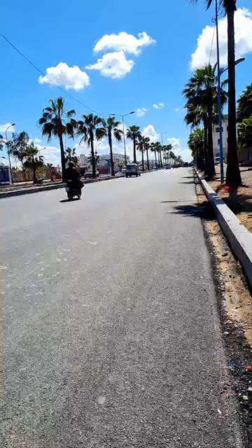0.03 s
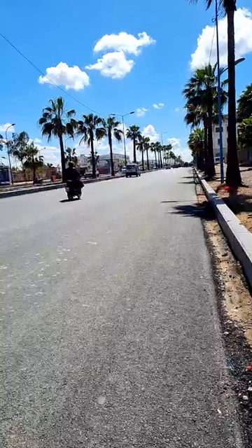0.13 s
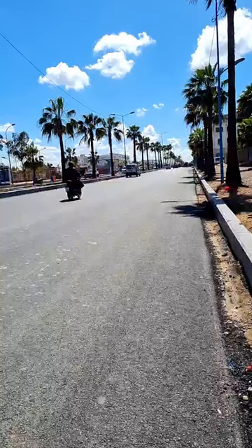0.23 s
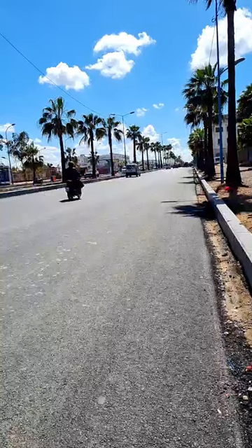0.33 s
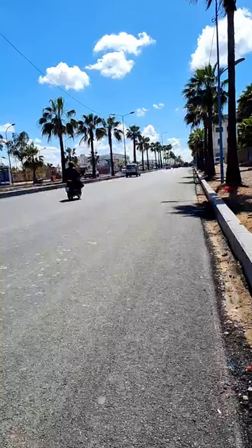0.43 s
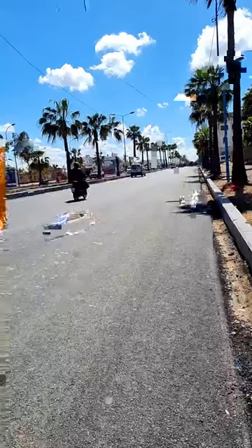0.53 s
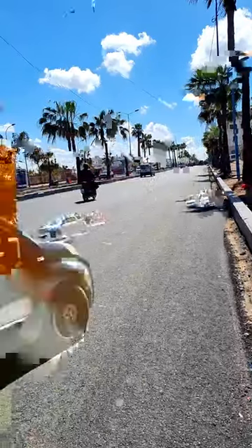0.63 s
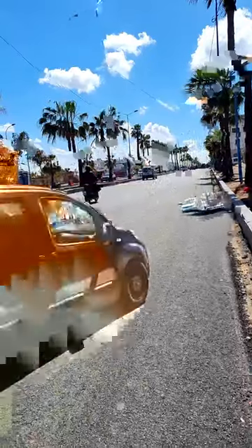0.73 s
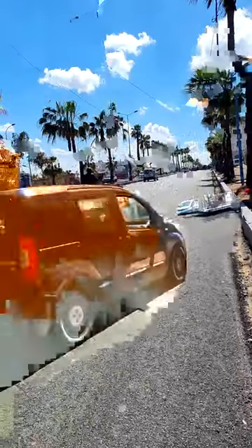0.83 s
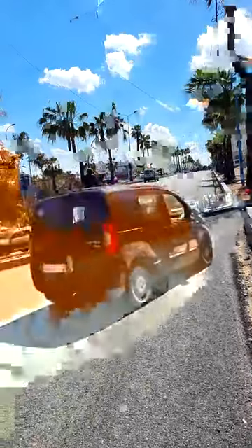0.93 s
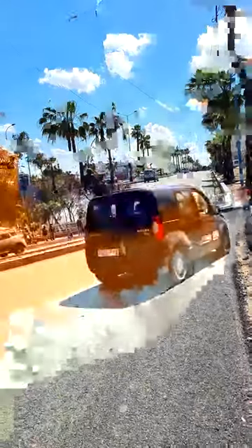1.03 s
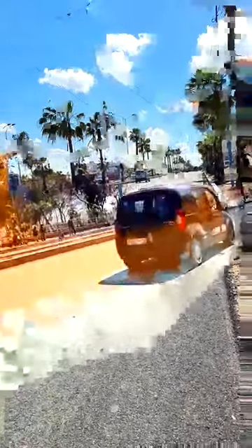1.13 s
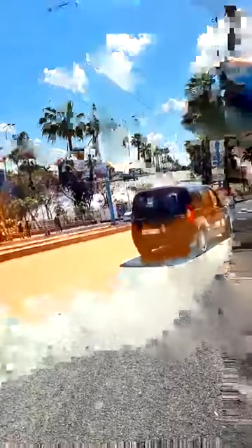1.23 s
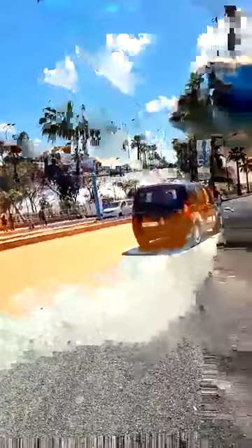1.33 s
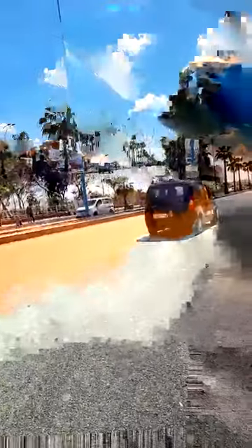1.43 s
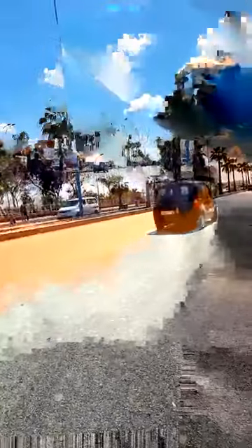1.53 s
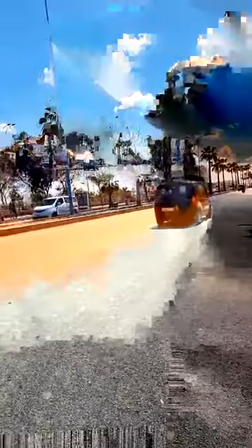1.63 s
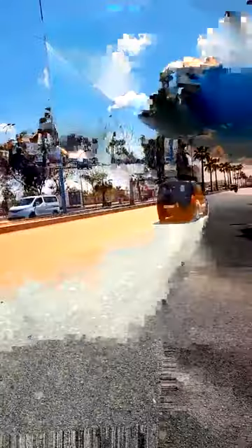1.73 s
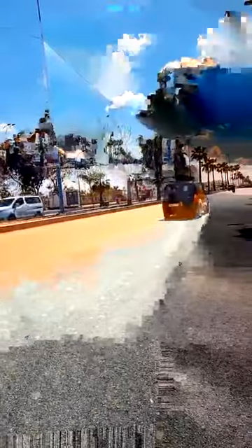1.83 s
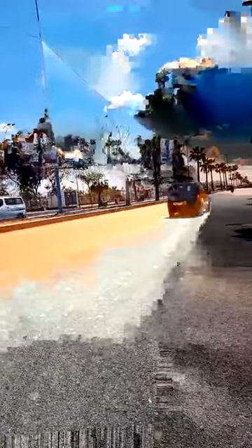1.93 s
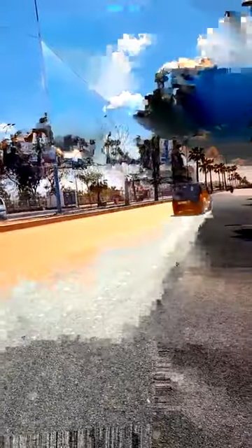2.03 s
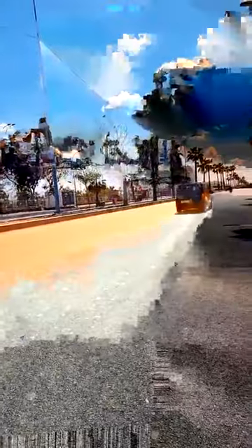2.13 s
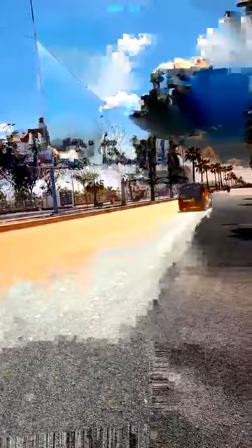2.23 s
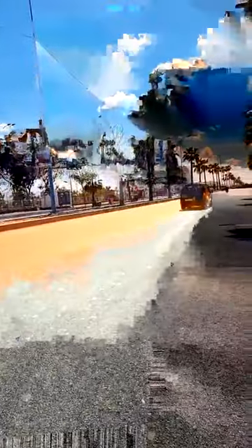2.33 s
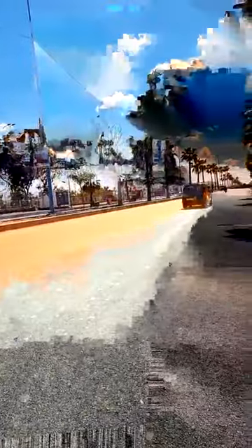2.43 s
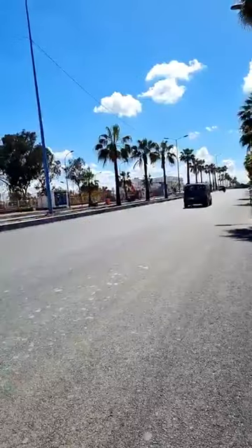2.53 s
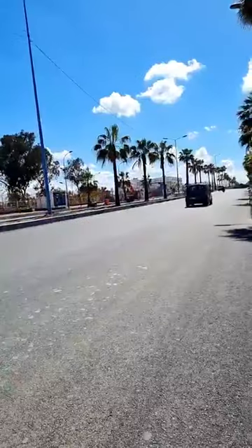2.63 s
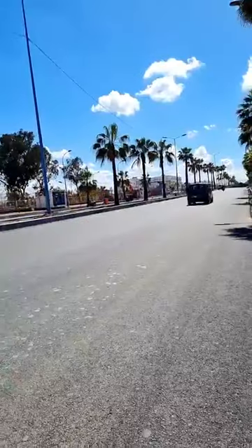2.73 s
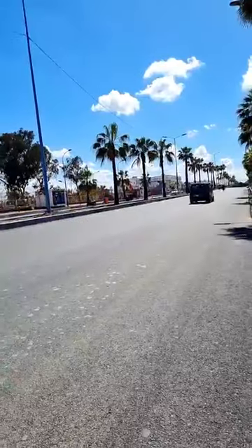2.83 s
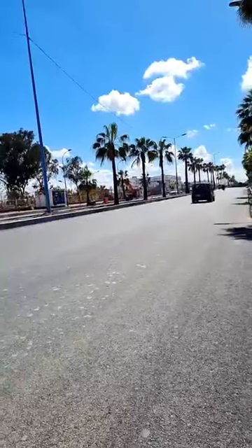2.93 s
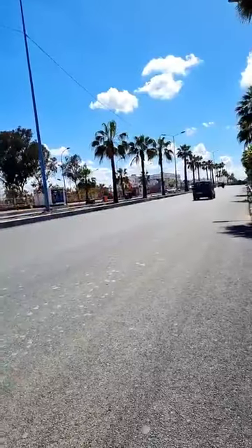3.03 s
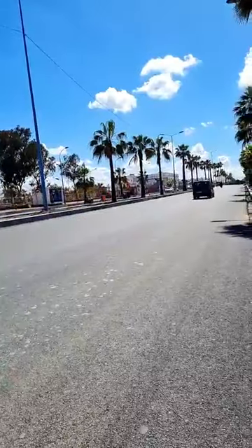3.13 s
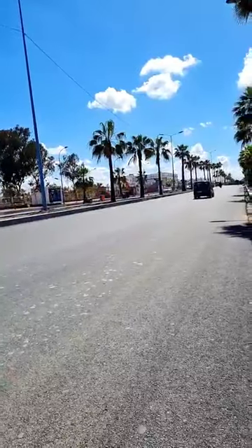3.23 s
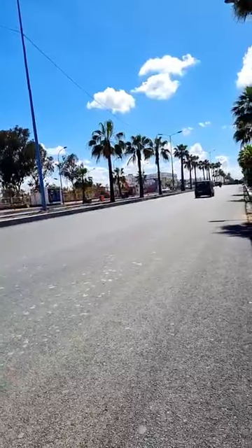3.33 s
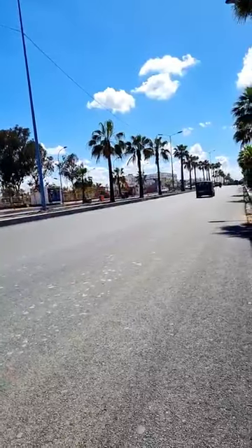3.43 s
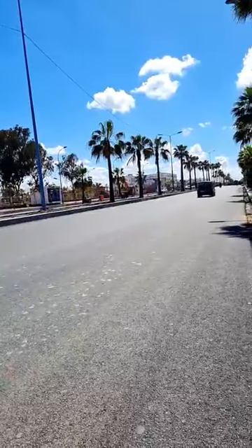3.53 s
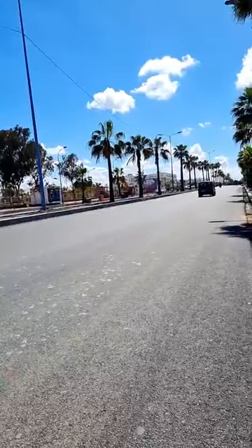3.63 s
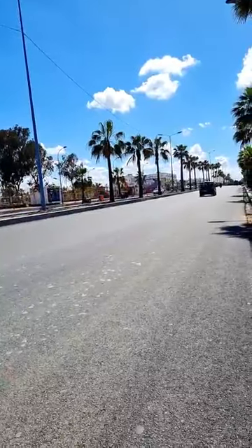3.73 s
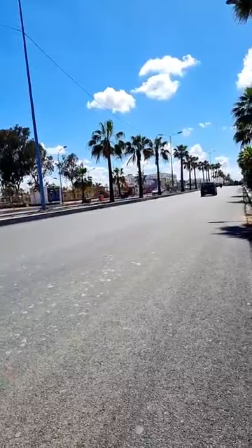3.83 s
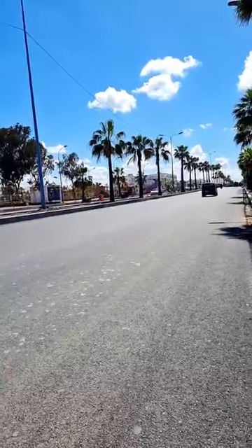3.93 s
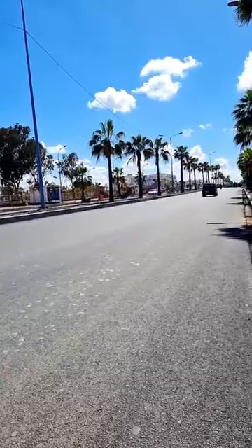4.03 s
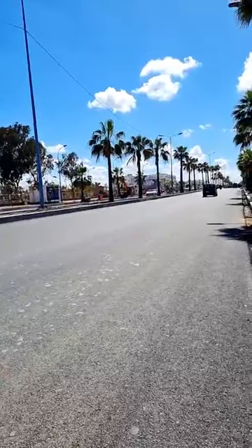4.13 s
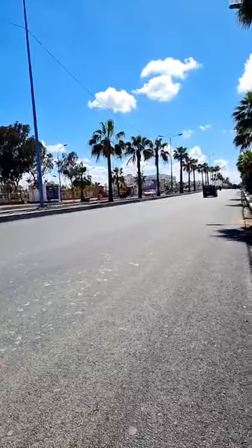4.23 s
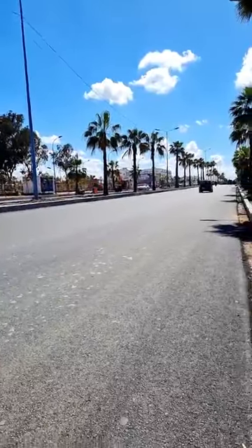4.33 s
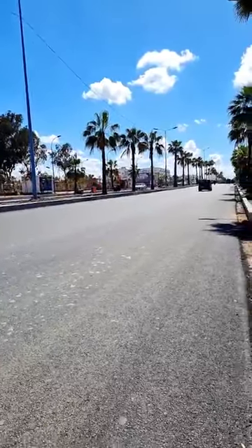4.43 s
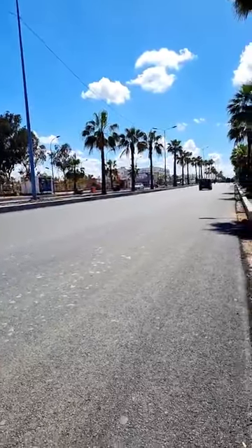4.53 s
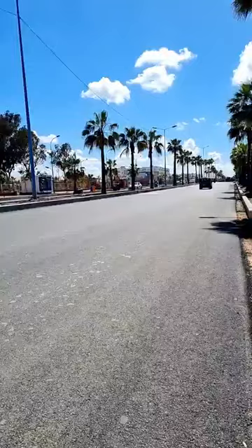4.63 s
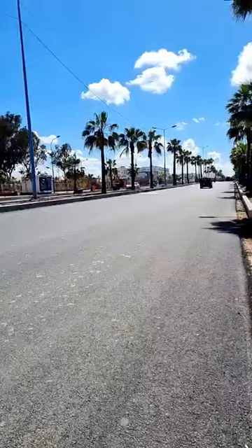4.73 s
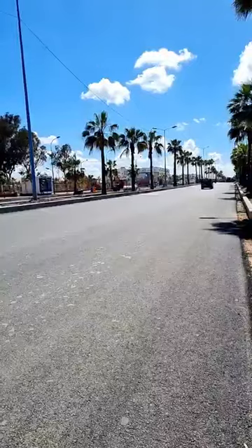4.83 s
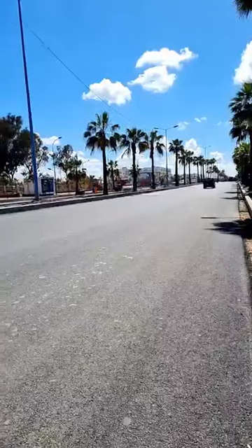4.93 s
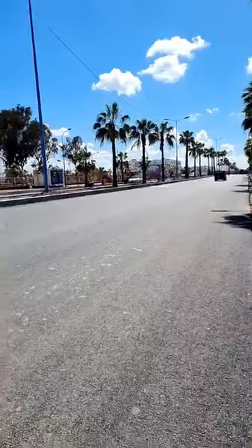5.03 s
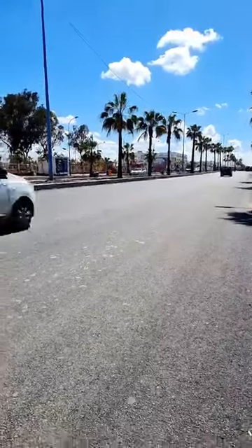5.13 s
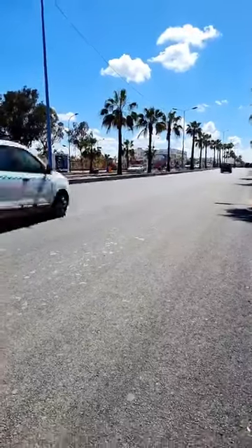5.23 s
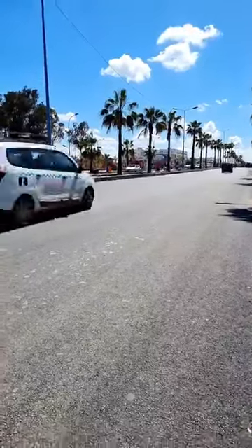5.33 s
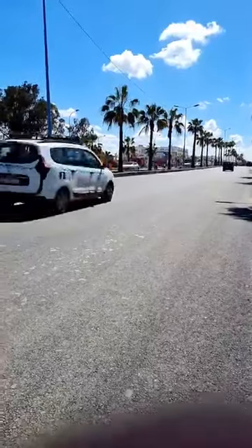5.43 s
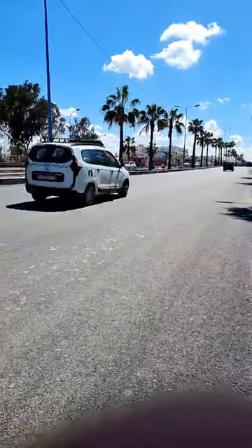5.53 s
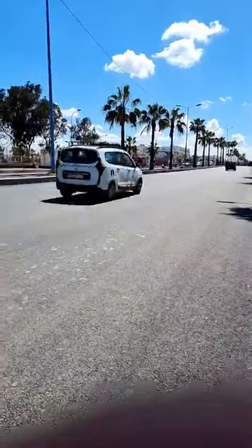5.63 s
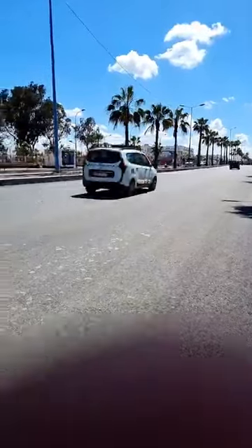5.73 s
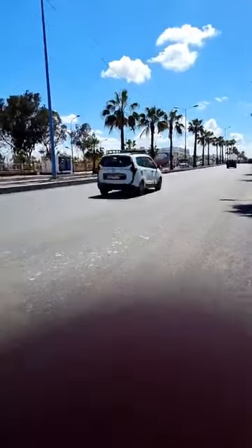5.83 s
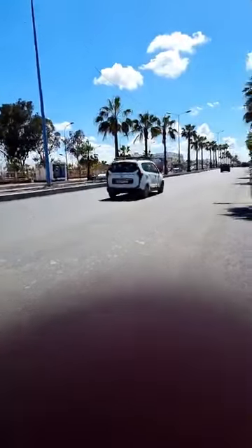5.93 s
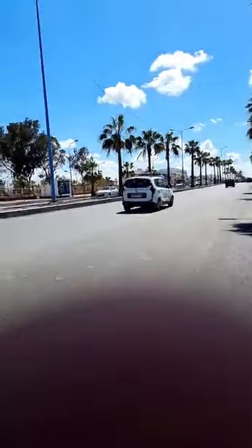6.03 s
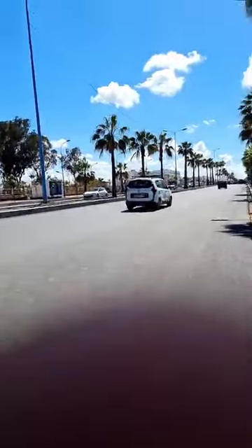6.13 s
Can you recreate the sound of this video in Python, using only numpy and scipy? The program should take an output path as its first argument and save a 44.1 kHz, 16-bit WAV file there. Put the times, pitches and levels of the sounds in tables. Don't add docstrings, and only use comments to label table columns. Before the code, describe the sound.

Silence until about 0.56 s, when the phone abruptly begins to hear a sunny roadside. A near car pulls away, its tyre roar strongest around 0.7 s, with rapid dry valve ticks, about forty a second, fading and vanishing by 1.4 s. A very faint high electronic whistle ends there too. Low, slightly band-limited traffic rumble stays, with a small engine's drone, a heavy vehicle's distant throb and scattered dull panel raps; a farther car swells weakly near 2.7 s. From 3.6 s a second engine grows. Tyre pops crack at 4.39 and 4.46 s, a deep wheel thud lands at 4.6 s, and the car roars by around 4.85 s, pitch sliding slightly down, easing at 5.2 s. From 5.4 s a finger gradually covers the microphone, making the road noise hollow, with light skin rubs and small clicks at 5.76 and 5.9 s, until 6.17 s.

```python
import sys
import numpy as np
from scipy import signal
from scipy.fft import rfft, irfft, next_fast_len
from scipy.io import wavfile
from scipy.ndimage import uniform_filter1d, map_coordinates

SR = 44100
rng = np.random.default_rng(int(sys.argv[2]) if len(sys.argv) > 2 else 0)


def level_to_linear(level):
    exponent = np.asarray(level, float) / 20
    return 10 ** exponent


def inscribe(sig):
    pcm = np.round(np.clip(np.atleast_2d(sig).T, -1, 1) * 32767)
    wavfile.write(sys.argv[1], SR, pcm.astype(np.int16))


N = 272097
T = np.arange(N) / SR


def unit(x):
    return x / np.sqrt(np.mean(x ** 2) + 1e-20)


def curves(rows):
    s, *cols = np.transpose(rows)
    return [np.interp(T, s, c) for c in cols]


def wobble(rate):
    coarse = T[::32]
    knots = rng.standard_normal(int(N * rate / SR) + 4)
    return np.interp(T, coarse, map_coordinates(knots, [coarse * rate]))


def bump(s, long_s):
    return np.exp(-((T - s) / long_s) ** 2)


def ramp(start, end):
    return np.clip((T - start) / (end - start), 0, 1)


def blend(share, far, near):
    share = np.clip(share, 0, 1)
    return np.sqrt(1 - share) * far + np.sqrt(share) * near


def filtered(x, response):
    m = next_fast_len(N + 8192)
    return irfft(rfft(x, m) * response(np.fft.rfftfreq(m, 1 / SR)), m)[:N]


def coloured(x, points):
    f, v = np.transpose(points)
    return filtered(x, lambda hz: level_to_linear(np.interp(np.log(hz + 1), np.log(f + 1), v)))


def rush(spectrum, patchy_db):
    z = signal.stft(rng.standard_normal(N), nperseg=1024)[2]
    field = uniform_filter1d(rng.standard_normal(z.shape), size=6, axis=0)
    field = uniform_filter1d(field, size=7, axis=1)
    patchy = signal.istft(z * level_to_linear(patchy_db * unit(field)), nperseg=1024)[1][:N]
    return unit(coloured(patchy, spectrum))


def lifted(x, bands, octaves):
    hz, t, z = signal.stft(x, SR, nperseg=1024)

    def at(v):
        return np.interp(t, T, v + 0 * T)

    db = 0
    for centre, lift in bands:
        distance = np.log2((hz[:, None] + 1) / at(centre)) / octaves
        db = db + at(lift) * np.exp(-distance ** 2)
    return signal.istft(z * level_to_linear(db), SR, nperseg=1024)[1][:N]


def order(hz, multiple, db, shake_db, drift):
    phase = 2 * np.pi * multiple * np.cumsum(hz) / SR + drift * wobble(5) + rng.uniform(0, 2 * np.pi)
    return np.sqrt(2) * level_to_linear(db + shake_db * wobble(6.1)) * np.sin(phase)


# t/s, f/Hz, level/dB
THROB = [(.56, 46.75, -26.5), (1.1, 49.02, -38), (2, 56.05, -37), (2.4, 53.28, -35), (2.8, 57.08, -40.5),
         (3.1, 53.13, -30), (3.9, 46.44, -34), (4.4, 47.5, -42), (6.17, 45.1, -40.5)]


def heavy_throb():
    hz, db = curves(THROB)
    return order(hz, 1, db, shake_db=1.8, drift=1.1)


# t/s, length/s, order, level/dB
SURGES = [(4.625, .12, 1, -31.5), (4.62, 0.14, 2, -31.5), (5.557, 0.15, 1, -27.5), (5.75, .35, 2, -33),
          (5.802, .2, 3, -36)]


def engine_behind():
    hz = np.full(N, 54.6)
    out = 0
    for s, long_s, multiple, db in SURGES:
        out = out + bump(s, long_s) * order(hz, multiple, db, shake_db=2, drift=0.18)
    return out


# t/s, f/Hz
DRONE_RATE = [(.5833, 41.0), (1.4, 41.25), (2.25, 41.5), (3.5, 42.1), (4.6, 42), (6.17, 41.5)]
# t/s, level/dB
DRONE = [(.56, -29.5), (1.0, -31.5), (1.4, -36), (2.2, -34), (3, -32.5), (3.6, -35.5), (4.3, -32.5),
         (4.9, -37), (6.17, -35.5)]
# multiple of the firing rate, level/dB
DRONE_ORDERS = [(2, -6.5), (3, -2), (4, -1), (5, 2.5), (6, 0), (7, -2)]


def drone():
    hz, db = curves(DRONE_RATE)[0], curves(DRONE)[0]
    return sum(order(hz, k, db + level - 7.5, shake_db=2, drift=0.66) for k, level in DRONE_ORDERS)


# t/s, peak level/dB, pulse length/ms, snap/ms
KNOCKS = [
    (4.3888, -8, .9, .12),
    (4.3887, -15, .1, .025),
    (4.456, -14, 1.5, .4),
]


def tyre_pops():
    out, t = np.zeros(N), np.arange(-2048, 2048) / SR
    for s, db, ms, snap_ms in KNOCKS:
        u = np.clip(t / (ms / 1000), -60, 60)
        snapped = (1 + np.tanh(u * ms / snap_ms)) / 2
        building = (1 - snapped) * np.exp(u / 0.87)
        recovering = 0.63 * snapped * np.exp(-u / 2.3)
        out[round(s * SR) - 2048:][:len(t)] += level_to_linear(db) * (building - recovering)
    return out


def wheel_thud():
    start_s, peak_db, ring_hz, t60_s = 4.5975, -2, 84, .06
    out, t = np.zeros(N), np.arange(2048) / SR
    thud = level_to_linear(peak_db - 60 * t / t60_s) * (1 - np.exp(-t / .004)) * np.sin(2 * np.pi * ring_hz * t)
    out[round(start_s * SR):][:len(t)] -= thud
    return out


# t/s, peak level/dB, ring f/Hz
DULL_RINGS = [(0.615, -17.5, 1005), (0.869, -19, 805), (1.433, -21.5, 630), (1.675, -17, 1020), (2.796, -25, 692),
              (3.61, -26, 770), (3.66, -19, 622), (5.139, -20.5, 905), (5.447, -21.5, 960)]


def dull_rings():
    out, t = np.zeros(N), np.arange(2048) / SR
    for s, db, hz in DULL_RINGS:
        ring = np.sin(2 * np.pi * hz * t) + 0.18 * np.sin(2 * np.pi * 1.37 * hz * t)
        out[round(s * SR):][:len(t)] += level_to_linear(db + 5 - 60 * t / .016) * (1 - np.exp(-t / .0006)) * ring
    return out


# t/s, peak level/dB, length/ms
RUBS = [(5.753, -35, 2.4), (5.775, -40, 18.5), (5.83, -47, 32), (5.862, -45, 28), (5.97, -46, 83),
        (6.055, -37, 3.3), (6.069, -42, 3.7), (6.14, -44, 11.2)]
# t/s, level/dB
TAPS = [
    (5.7565, -21),
    (5.9052, -26),
]
# f/Hz, level/dB
CASE = [(1200, -26), (2000, -7), (3000, -6), (3700, 0), (4500, -6), (5500, -6), (6500, -8), (7600, -15),
        (9000, -60)]


def finger():
    level = sum(level_to_linear(db) * np.exp(-((T - s) * 1000 / ms) ** 2 * 2) for s, db, ms in RUBS)
    grain = level_to_linear(-8 + 2 * wobble(300))
    rubs = level * grain * unit(coloured(rng.standard_normal(N), CASE))
    taps = np.zeros(N)
    for s, db in TAPS:
        taps[round(s * SR)] = level_to_linear(db + 17.5)
    ring_hz, wide_hz, ring_db = 3650, 450, .5

    def ring(f):
        return .75 + level_to_linear(ring_db) * 1j * f * wide_hz / (ring_hz ** 2 - f * f + 1j * f * wide_hz)

    return rubs + filtered(coloured(taps, CASE), ring)


# t/s, length/s, level/dB
TICK_LULL = (1.13, 0.035, -2.5)


def ticks_db():
    swing = 3 * np.cos(2 * np.pi * (T - 0.638) / .0735)
    s, long_s, lull_db = TICK_LULL
    lull = lull_db * bump(s, long_s)
    sag = 13 * np.abs(T - CARS[0][0] - .08)
    lost = 71.5 * np.maximum(T - 1.32, 0)
    return -29.5 + swing + lull - sag - lost


# f/Hz, width/Hz, level/dB
VALVE = [(2800, 300, -12), (3550, 220, -9), (3930, 220, -2.5), (4470, 230, 0), (5550, 350, -10),
         (6300, 400, -16)]
# start t/s, end t/s
RECEDE_S = (1.08, 1.2)


def valves():
    turns = np.cumsum(curves(DRONE_RATE)[0] * (T > .5833)) / SR
    at = np.searchsorted(turns, np.arange(int(turns[-1]))) + 30
    luck = rng.standard_normal((len(at), 3))
    blows = np.zeros(N + SR)
    blows[at] = level_to_linear(1.3 * luck[:, 0])
    bounce_after = np.round(59.1 + 1.3 * luck[:, 1]).astype(int)
    blows[at + bounce_after] = level_to_linear(-4 + 1.5 * luck[:, 2])
    rattle = 0.036 * level_to_linear(-60 * (turns % 1) / 0.52) * rng.standard_normal(N) * (turns > 0)

    def cover(f):
        total = 0
        for k, (centre, wide, db) in enumerate(VALVE):
            total = total + (-1) ** k * level_to_linear(db) * 1j * f * wide / (centre * centre - f * f + 1j * f * wide)
        return total

    def sharp(f):
        return cover(f) * cover(f) / (np.abs(cover(f)) + 0.12)

    struck = level_to_linear(ticks_db() + 29) * (blows[:N] + rattle)
    gone = ramp(*RECEDE_S)
    near = filtered(struck * (1 - gone), sharp)
    return near + filtered(struck * gone, lambda f: sharp(f * 1.03))


# t/s, length/s, second order level/dB
BARK = (4.77, 0.037, -25.5)


def passing_engine():
    coming_hz, going_hz, slide_s = 67.4, 63.4, 0.22
    hz = going_hz + (coming_hz - going_hz) * (1 - np.tanh((T - CARS[1][0]) / slide_s)) / 2
    pull_s, lift_s, coast_db = 3.6, 5.22, -12
    load = ramp(pull_s - .04, pull_s + .04) * (1 - ramp(lift_s - .05, lift_s + 0.036))
    first_db = -31.5 + 4.5 * (T - pull_s) + coast_db * (1 - load)
    s, long_s, bark_db = BARK
    second_db = 20 * np.log10(level_to_linear(first_db - 5.5) + level_to_linear(bark_db) * bump(s, long_s))
    heard = np.clip((T - 3.2) / .3, 0, 1) * np.clip((5.6 - T) / 0.22, 0, 1)
    first = order(hz, 1, first_db, shake_db=1.5, drift=0.2)
    return heard * (first + order(hz, 2, second_db, shake_db=1.4, drift=0.3))


# t/s, time to roll its distance/s, roar level/dB, whine level/dB, hiss level/dB
CARS = [
    (.7, 0.26, -24.5, -43, -40),
    (4.85, 0.38, -26.5, -37.5, -41.5),
    (2.7, .5, -42.5, -53.5, -55.5),
]
FALL_DB = {"rumble": 10.5, "roar": 12, "whine": 9.5, "hiss": 20}
AHEAD_S = {"rumble": 0.03, "roar": 0.0089, "whine": 0.16, "hiss": 0.08}
CITY_DB = {"rumble": -30, "roar": -34, "whine": -55.5, "hiss": -50}
# t/s, level/dB
TRAFFIC = [(.56, -0.5), (1.5, 0.6), (2.3, -.5), (2.85, 1.9), (3.2, 3.5), (3.6, 1), (4.2, 1), (5.5, 4.5),
           (6.17, 1)]
COVER_DB = {"rumble": 1, "roar": -6.5, "whine": 5.5, "hiss": -1}
COVER_S, COVERED_S = 5.4, 6.14


def layer_db(name, column, over_db=0):
    swell = curves(TRAFFIC)[0] * (1 if name == "rumble" else 0.26)
    power = level_to_linear(CITY_DB[name] + swell) ** 2
    for car in CARS:
        away = (T - car[0] + AHEAD_S[name]) / car[1]
        power = power + level_to_linear(car[column] + over_db - FALL_DB[name] * np.log10(1 + away ** 2)) ** 2
    return 10 * np.log10(power) + COVER_DB[name] * ramp(COVER_S, COVERED_S)


# t/s, length/s
FACING = [
    [(.58, 0.084), (.95, 0.37)],
    [(4.68, .22), (5.05, .2)],
]


def faces(table):
    bands = []
    for sides, times in zip(table, FACING):
        for side, when in zip(sides, times):
            bands += [(hz, db * bump(*when)) for hz, db in side]
    return bands


# f/Hz, level/dB per Hz
RUMBLE = [(13, -32), (22, -4), (70, 2.5), (226, -4.5), (288, -5.5), (342, -15.5), (400, -14.5),
          (520, -31.5), (880, -120)]
# f/Hz, level/dB per Hz
BOOM = [(13, -34.5), (22, -8.5), (54, 0), (120, -2.5), (177, -10.5), (252, 1.5), (359, -19), (400, -13),
        (520, -44), (880, -120)]


def rumble(swell):
    near = (layer_db("roar", column=2) + 32) / 7
    noise = blend(near, rush(RUMBLE, patchy_db=1), rush(BOOM, patchy_db=1))
    return level_to_linear(layer_db("rumble", column=2, over_db=1) - 1.5 + 0.44 * swell) * noise


# f/Hz, level/dB per Hz
ROAR_FAR = [(180, -38), (300, -9), (332, -4), (602, -4.5), (733, -6.5), (1120, -8.5), (1700, -22),
            (2210, -43), (3740, -120)]
ROAR_NEAR = [(180, -35.5), (300, 3.5), (481, -1.5), (733, -2), (1020, -1), (1250, -5.5), (1700, -16),
             (2210, -40), (3740, -120)]
# f/Hz, lift level/dB
SING = [
    [[(1000, -2)], [(930, 3), (620, 2)]],
    [[(1120, 2)], [(860, 6)]],
]
# f/Hz, lift level/dB
POCKET = [
    (2150, 5.5),
    (790, 7),
]


def roar(swell):
    db = layer_db("roar", column=2)
    noise = blend((db + 32) / 7, rush(ROAR_FAR, patchy_db=0.55), rush(ROAR_NEAR, patchy_db=1.05))
    full_hz, full_db = POCKET[1]
    far_sing = (647, 1.22)  # Hz, dB
    sing = faces(SING) + [far_sing, (full_hz, full_db * ramp(COVER_S, COVERED_S))]
    return level_to_linear(db - 1 + 0.17 * swell) * lifted(noise, sing, octaves=0.32)


# f/Hz, level/dB per Hz
WHINE = [(820, -22), (1400, 4), (1740, -4), (1840, -3), (2110, -7), (2480, -25.5), (2700, -35), (3510, -47),
         (5940, -120)]


def whine(swell):
    return level_to_linear(layer_db("whine", column=3) - 1 + 0.28 * swell) * rush(WHINE, patchy_db=2.5)


# f/Hz, level/dB per Hz
HISS_NEAR = [(1290, -33.5), (2200, -5), (2900, -4.5), (4770, -9.5), (6850, -16), (7600, -33), (9880, -67.5),
             (16700, -120)]
HISS_FAR = [(1290, -20.5), (2200, -3), (3200, -6.5), (3810, -6), (4940, -11), (6270, -14.5), (7100, -17),
            (7600, -20.5), (9880, -61), (16700, -120)]


def hiss(swell):
    db = layer_db("hiss", column=4) - 4 * bump(5.7, 0.23)
    noise = blend((db + 49) / 8, rush(HISS_FAR, patchy_db=0.7), rush(HISS_NEAR, patchy_db=1.5))
    return level_to_linear(db - 0.5 + 1.2 * swell + 0.4 * wobble(30)) * noise


# f/Hz, lift level/dB
GLARE = [
    [[(3200, 5)], [(2780, 4.5)]],
    [[(3950, 6), (4750, 6.5)], [(2150, 5.5), (2700, 5.5), (3700, 3)]],
]
HOLLOW_HZ = [350, 373]
HOLLOW_DB = [-7.5, -13]
HOLLOW_S = [0.92, 0.39]
# t/s, length/s, f/Hz, level/dB
LEVEL_DIP = (5, 0.04, 220, -6.5)


def road():
    swell, cover = wobble(4.03), ramp(COVER_S, COVERED_S)
    hollow = []
    for car, hz, db, long_s in zip(CARS, HOLLOW_HZ, HOLLOW_DB, HOLLOW_S):
        hollow.append((hz, db * bump(car[0] + 0.65, long_s)))
    dip_s, dip_long_s, dip_hz, dip_db = LEVEL_DIP
    hollow.append((dip_hz, dip_db * bump(dip_s, dip_long_s)))
    thin_hz, thin_db = POCKET[0]
    pocket = [(thin_hz, thin_db * np.sqrt(cover)), (.86 * thin_hz, 0.44 * thin_db * cover)]
    low = lifted(rumble(swell) + roar(swell), hollow, octaves=.22)
    return low + lifted(whine(swell) + hiss(swell), faces(GLARE) + pocket, octaves=0.13)


def scene():
    far = heavy_throb() + engine_behind() + drone()
    contacts = tyre_pops() + wheel_thud() + dull_rings() + finger()
    return (far + contacts + valves() + passing_engine() + road())[None]


def thinned_treble(x, edge_hz, keep_db, vary_db):
    hz, t, z = signal.stft(x, SR, window="cosine", nperseg=2822)
    hz = hz[:, None]
    loud_db = uniform_filter1d(10 * np.log10(np.sum(np.abs(z) ** 2, axis=0) + 1e-9), size=3)
    luck = np.repeat(np.clip(rng.standard_normal(len(t)), -2, 1.6), 2)[:len(t)]
    limit_db = keep_db + 0.65 * (loud_db + 30.5) + vary_db * luck + (hz - edge_hz) / 130
    keep = (np.abs(z) > level_to_linear(limit_db)) | (hz < 5500)
    leak = level_to_linear(-23.5) * (luck < 0)
    return signal.istft(z * np.where(hz < 7500, keep, leak), SR, window="cosine", nperseg=2822)[1][:N]


def roll_off(x):
    return signal.sosfilt(signal.butter(12, 15720, fs=SR, output="sos"), x)


def record(dry):
    whistle_db = -76.5 + 3 * wobble(14) - 6 * (T - .9)
    whistle = level_to_linear(whistle_db) * np.sin(2 * np.pi * 7688 * T) * (T < 1.45)
    x = filtered(dry[0], lambda hz: 1 / (1 + (35 / (hz + 1)) ** 6))
    x = thinned_treble(x, edge_hz=7220, keep_db=-86.5, vary_db=3.5)
    listening = T > .5643
    x = filtered((x + whistle) * listening, lambda hz: 1 / (1 + (hz / 7950) ** 60))
    x = x + level_to_linear(-99) * rng.standard_normal(N) * listening
    return roll_off(x[None])


dry = scene()
out = record(dry)
inscribe(out)
```